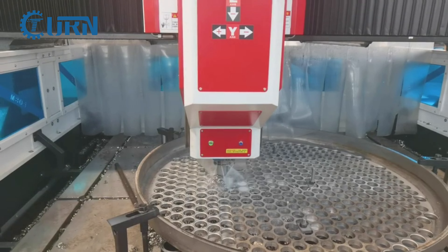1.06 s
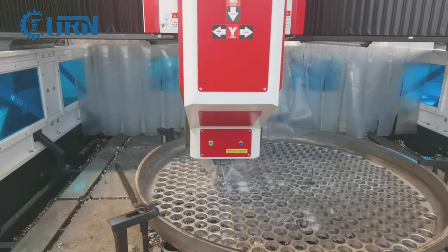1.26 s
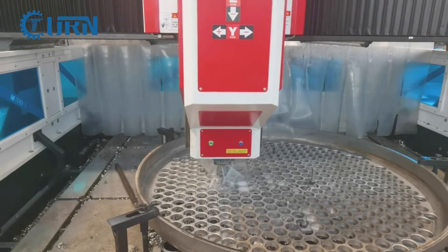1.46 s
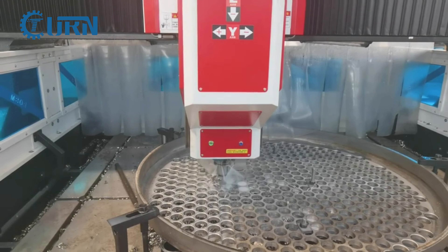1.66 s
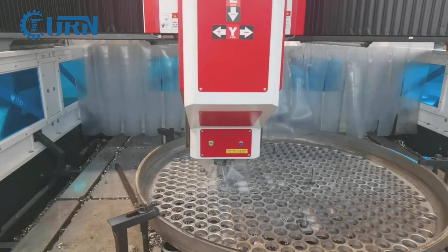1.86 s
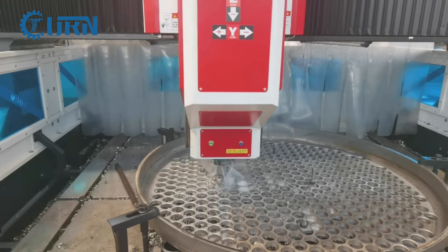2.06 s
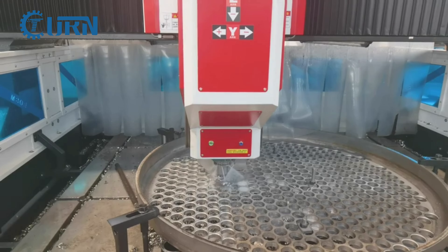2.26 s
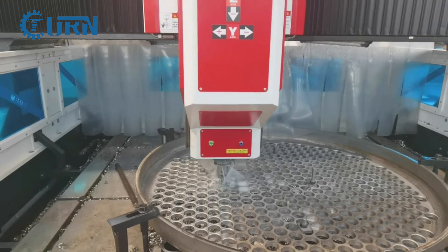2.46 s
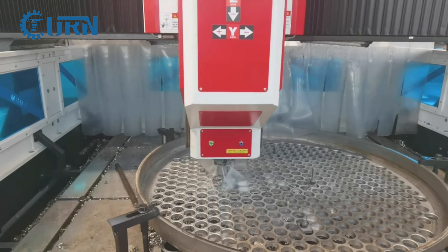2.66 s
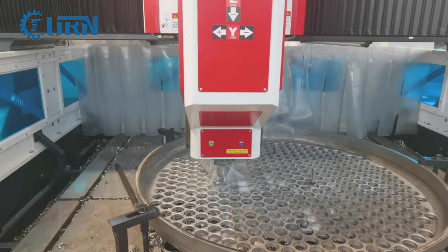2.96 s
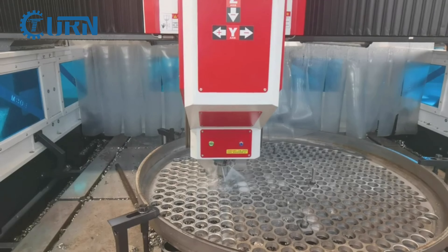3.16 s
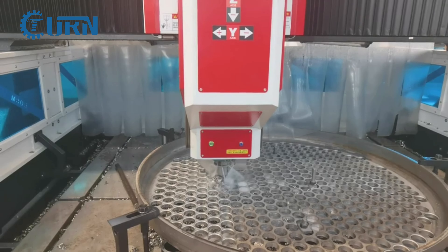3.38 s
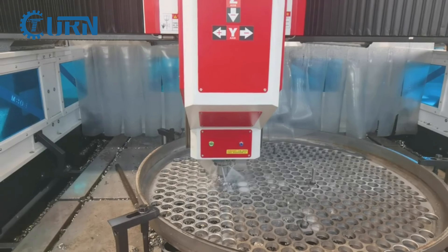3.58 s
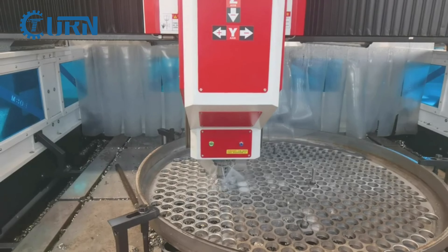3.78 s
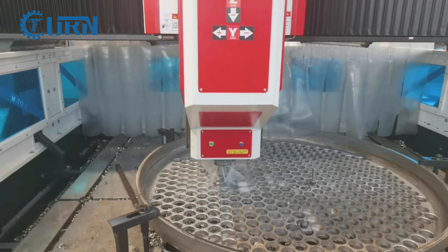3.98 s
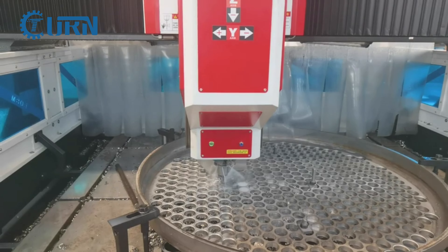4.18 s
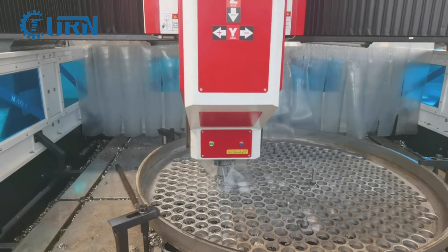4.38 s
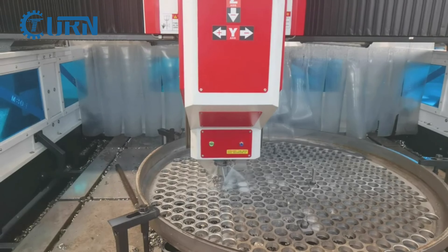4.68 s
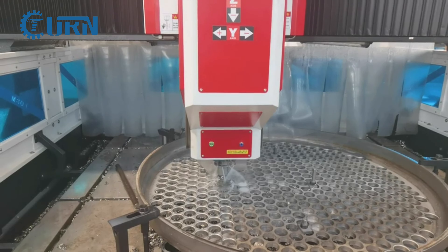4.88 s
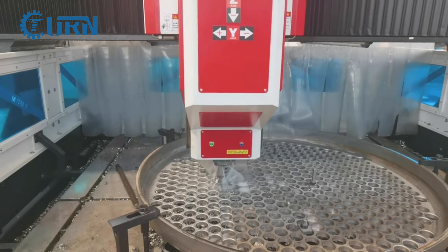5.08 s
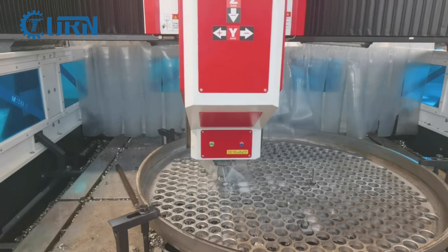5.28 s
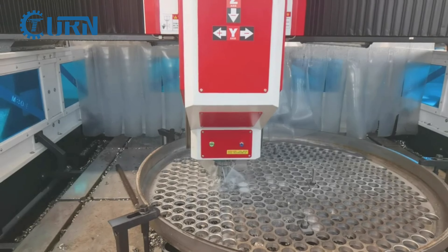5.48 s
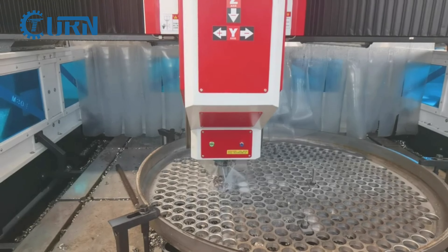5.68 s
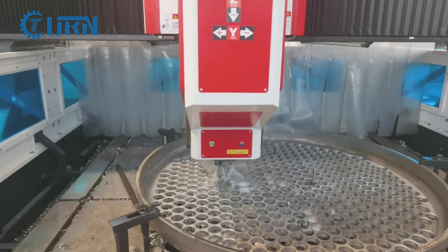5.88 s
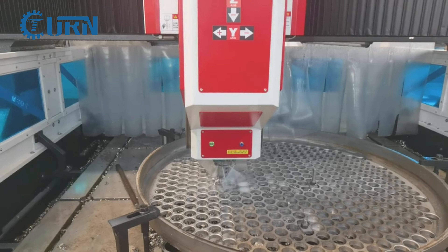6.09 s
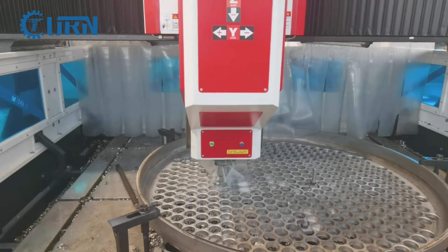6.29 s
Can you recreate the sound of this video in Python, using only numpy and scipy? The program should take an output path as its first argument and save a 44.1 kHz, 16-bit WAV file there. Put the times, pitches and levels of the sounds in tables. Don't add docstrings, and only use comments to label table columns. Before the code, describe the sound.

Steady wet hiss of coolant spattering on steel, loose metal rumbling at the start and again later, thin whine and short high squeals over hall hum.

```python
import sys
import numpy as np
from scipy import signal
from scipy.fft import rfft, irfft, next_fast_len
from scipy.io import wavfile
from scipy.ndimage import uniform_filter1d

SR = 44100
rng = np.random.default_rng(int(sys.argv[2]) if len(sys.argv) > 2 else 0)


def attenuation_scalar(level_db):
    decades = np.asarray(level_db, float) / 20
    return 10 ** decades


def output_pcm(signal):
    pcm = np.clip(np.atleast_2d(signal).T, -1, 1) * 32767
    wavfile.write(sys.argv[1], SR, np.round(pcm).astype(np.int16))


N = 284004
T = np.arange(N) / SR
M = next_fast_len(N, True)
FREQ = np.arange(M // 2 + 1) * SR / M


def unit(x):
    return x / np.sqrt(np.mean(x ** 2))


def on_log(table, hz):
    rows = np.array(table)
    return np.interp(np.log(hz), np.log(rows[:, 0]), rows[:, 1])


def curve(spans, column, off=-85.0):
    out = np.full(N, off)
    for rows in map(np.array, spans):
        inside = (T >= rows[0, 0]) & (T <= rows[-1, 0])
        value = np.interp(T[inside], rows[:, 0], rows[:, column])
        out[inside] = np.maximum(out[inside], value) if off < 0 else value
    return out


def bumps(rows):
    coarse = T[::32]
    db = sum(db * np.exp(-(2 * (coarse - s) / length) ** 2) for s, db, length in rows)
    return np.interp(T, coarse, db)


def walk(rate_hz, slew=0.84):
    hold = int(SR / rate_hz)
    steps = np.repeat(rng.standard_normal(N // 400 + 1), hold)[:N]
    slewed = uniform_filter1d(steps, int(hold * slew) + 1)
    return unit(uniform_filter1d(slewed, int(hold * slew / 2) + 1))


def grains(per_s, spread_db, share):
    hit = rng.random((2, M)) < per_s / SR
    size = attenuation_scalar(spread_db * rng.standard_normal((2, M))) * np.sign(rng.standard_normal((2, M)))
    return rfft(rng.standard_normal((2, M)) + share * unit(hit * size))


# frequency in Hz, left-right correlation.
SIDE_LIKENESS = [(60, 0.916), (260, 0.95), (530, 0.67), (1090, -.1), (1500, -0.1), (2250, .05), (9000, .03)]
# frequency in Hz, left minus right in dB.
SIDE_LEAN = [(60, 3.5), (110, -2), (190, -1), (330, 0.5), (570, 2), (1000, 1), (1760, 1.5), (3100, 0.5),
             (5440, 1), (9560, 0.5)]


def stereo(drive, shape):
    like = np.clip(on_log(SIDE_LIKENESS, FREQ + 1), -.5, 1)
    lean = attenuation_scalar(on_log(SIDE_LEAN, FREQ + 1) / 2)
    mid, side = drive[0] * np.sqrt(1 + like), drive[1] * np.sqrt(1 - like)
    return np.array([(mid + side) * lean, (mid - side) / lean]) * shape


def bands(drive, colour, lo_hz, hi_hz, move_db):
    tone = stereo(drive, attenuation_scalar(on_log(colour, FREQ + 1)) * (FREQ > lo_hz) * (FREQ < hi_hz))
    place, out = 2 * np.log2((FREQ + 1) / lo_hz), 0
    for k in range(int(place[FREQ < hi_hz].max()) + 2):
        share = np.cos(np.pi / 2 * np.clip(place - k, -1, 1)) ** 2
        out = out + irfft(tone * share, M)[:, :N] * attenuation_scalar(move_db(lo_hz * 2 ** (k / 2)))
    return out / np.std(irfft(tone, M))


def resonance(drive, hz, width_hz):
    mode = np.minimum(FREQ / hz, 1) ** 2 / (1 + 2j * (FREQ - hz) / width_hz)
    return unit(irfft(stereo(drive, mode), M)[:, :N])


# frequency in Hz, density in dB per Hz.
JET_COLOUR = [(900, -40), (1500, -18), (2300, -7.5), (2900, -5), (3300, -2.5), (4700, -0.5), (5600, 0),
              (6300, -3), (8600, -10.5), (9900, -13)]
# time in seconds, level in dB.
FLOW = [
    (0, -30.5),
    (1.1, -30),
    (2.4, -28),
    (3.0, -29.5),
    (3.5, -27),
    (4.6, -28.5),
    (5.2, -28.5),
    (6.44, -29),
]
# time in seconds, dB re flow, length in seconds.
GUSHES = [(0.035, 0.5, 0.023), (0.132, 0.5, 0.014), (0.19, -3.5, 0.037), (0.44, -3, 0.23),
          (0.249, 1.5, 0.068), (0.349, -3, 0.051), (0.387, 4, 0.032), (0.434, 1.5, 0.025),
          (0.469, -0.5, 0.033), (0.521, 1.5, 0.12), (0.943, 2, 0.029), (1.15, -2, 0.11), (1.272, -1, 0.038),
          (1.337, 2.5, 0.029), (1.404, 1.5, 0.12), (1.457, -1.5, 0.052), (1.616, -3.5, 0.031),
          (1.831, -2.5, 0.06), (2.133, -2.5, 0.042), (2.178, 2, 0.039), (2.285, -3, 0.029),
          (2.315, 3.5, 0.029), (2.472, 4.5, 0.092), (2.519, -2.5, 0.09), (2.569, -1, 0.02),
          (2.614, 2.5, 0.1), (2.701, -0.2, 0.054), (2.739, 1.5, 0.058), (2.826, -1.5, 0.041),
          (2.923, -2, 0.035), (2.963, -2.5, 0.016), (3.178, -1, 0.043), (3.322, -0.5, 0.069),
          (3.375, 1.5, 0.07), (3.532, 2, 0.053), (3.589, 4, 0.025), (3.637, -1.5, 0.028),
          (3.709, -2, 0.031), (3.799, 0.5, 0.073), (3.869, -3.5, 0.077), (3.986, 2, 0.026),
          (4.076, -1, 0.09), (4.195, -1, 0.03), (4.233, 1.5, 0.021), (4.285, 2.5, 0.1), (4.38, -3.5, 0.042),
          (4.495, -2.5, 0.038), (4.612, 0, 0.089), (4.727, -6.5, 0.046), (4.764, 3, 0.035),
          (4.799, 2.5, 0.067), (5.056, -0.5, 0.045), (5.158, -1.5, 0.068), (5.196, 3, 0.09),
          (5.537, 1.95, 0.11), (5.702, -0.5, 0.082), (6.011, -1.5, 0.077), (6.051, 3, 0.047),
          (6.119, 4, 0.049), (6.238, 2, 0.031)]


def jet():
    gush_db = bumps(GUSHES)
    level_db = curve([FLOW], 1) + gush_db
    splash_db = -0.07 + 0.26 * gush_db
    puffs, low, high = 1.3 * walk(70), walk(30), walk(30)
    puffs = puffs - uniform_filter1d(puffs, size=2300)

    def move_db(hz):
        octave = np.log2(hz / 5000)
        patch = np.cos(octave) * high + np.sin(octave) * low
        splash = np.clip(-1.6 * octave, 0, 1) * splash_db
        flutter = puffs * np.clip(1 - 0.8 * octave, 0, 1)
        return level_db + splash + flutter + .5 * patch + 0.87 * walk(30)
    return bands(grains(2000, 3.5, .55), JET_COLOUR, 1500, 10200, move_db) * attenuation_scalar(3.0)


# start in seconds, hold in seconds, body in dB, boom and clatter in dB re body.
SURGES = [(-.2, .1, -21, -10, 1), (0.041, 0.025, -26.5, -20, 0.5), (0.157, 0.015, -26.5, -21, 0.5),
          (0.219, 0.013, -21, -15, 0), (0.33, 0.071, -23, -11, -5), (0.483, 0.089, -27.5, -25, 1.5),
          (0.63, .03, -33, -17, 2), (0.771, .05, -39.5, -21, 4.5), (3.663, 0.089, -30.5, -2.5, 4.5),
          (3.859, 0.046, -35.5, 2, 4.5), (4.001, 0.03, -31, -9, 1), (4.087, 0.065, -25, -2, 1.0),
          (4.243, 0.13, -28, -9, 0.5), (4.352, 0.04, -32.5, -2, 3.5), (4.474, 0.1, -28.5, -6.5, 1),
          (4.725, 0.12, -33, -1, -7.5), (4.934, 0.083, -43, 10.5, -3)]


def surges(column, fade_db_s):
    power, rise_s, rise_db = 1e-9, 0.1, 12
    for row in SURGES:
        since_top = T - row[0] - rise_s
        peak_db = row[2] + (row[column] if column else 0)
        rise = rise_db * np.minimum(since_top / rise_s, 0)
        db = peak_db + rise - fade_db_s * np.maximum(since_top - row[1], 0)
        power = power + attenuation_scalar(np.maximum(db, -120)) ** 2
    return 10 * np.log10(power)


# frequency in Hz, density in dB per Hz.
RUMBLE_COLOUR = [(24, -50), (40, -27.5), (124, -9), (185, -3), (219, -4.5), (400, -5.5), (527, -4.5),
                 (611, -5.5), (1100, -4), (1570, -2), (2440, -2.5), (6000, -13), (7800, -47), (13200, -120)]
# frequency in Hz, width in Hz, level in dB re body.
PANELS = [(184.6, 12, -19), (463.3, 6.4, -19), (519, 13, -17.5), (633, 15, -20), (706.7, 12, -16.5),
          (956, 13, -18.5), (1100, 30, -20.5), (1216, 12, -18.5), (330.4, 13, -23), (395.6, 11, -25),
          (1676, 25, -22), (3564, 62, -20.5)]
# time in seconds, dB re surge, length in seconds.
KNOCKS = [(0.017, -0.3, 0.021), (0.082, 0.9, 0.031), (0.137, -2.1, 0.036), (0.195, -2, 0.05),
          (0.244, 4, 0.015), (0.314, -0.7, 0.057), (0.384, -0.1, 0.081), (0.446, 2, 0.03),
          (0.514, -0.6, 0.024), (0.693, 1, 0.022), (0.741, 1.5, 0.027), (0.791, -0.3, 0.02),
          (3.662, -1, 0.055), (3.754, -0.5, 0.03), (3.776, 1, 0.026), (3.811, -0.5, 0.074),
          (3.886, -1.5, 0.052), (3.941, 2, 0.028), (4.008, -4.5, 0.027), (4.053, -3.5, 0.071),
          (4.106, 4.5, 0.024), (4.146, 1.5, 0.083), (4.18, 0.4, 0.015), (4.358, 1.2, 0.044),
          (4.383, -2, 0.062), (4.442, 2, 0.048), (4.517, 0.5, 0.061), (4.555, 1.0, 0.014),
          (4.59, 1.6, 0.031), (4.702, 0.5, 0.061), (4.737, -0.2, 0.097), (4.827, 2.5, 0.02),
          (4.851, -2, 0.027), (4.886, 1.5, 0.042)]
# time in seconds, dB re surge, length in seconds.
MORE_KNOCKS = [(0.342, 4.5, 0.019), (0.28, -1.5, 0.019), (0.41, 3, 0.05), (0.69, 2.5, 0.017), (0.305, 4, 0.033),
               (0.21, -1, 0.028), (4.22, 2, 0.03), (4.30, 2.5, 0.023), (4.485, -5, 0.04), (4.25, 2, 0.02),
               (4.335, 1, 0.025), (4.545, 2, 0.029), (4.612, 3.5, 0.024)]


def rumble():
    body_db = surges(column=0, fade_db_s=47)
    boom_db = surges(column=3, fade_db_s=56) - body_db + 5
    clatter_db = surges(column=4, fade_db_s=54.5) - body_db
    drive, knocks = grains(900, 2.5, .5), 0.6 * walk(45, 0.3)

    def move_db(hz):
        boom, clatter = np.clip(np.log2(600 / hz), 0, 1), np.clip(np.log2(hz / 1300), 0, 1)
        return boom * boom_db + clatter * clatter_db + knocks + 1.5 * walk(30, 0.44)
    wash = bands(drive, RUMBLE_COLOUR, 30, 6000, move_db) * attenuation_scalar(2.0)
    rings = sum(attenuation_scalar(db + 1.5 * walk(5.5)) * resonance(drive, hz, width) for hz, width, db in PANELS)
    return (wash + rings) * attenuation_scalar(uniform_filter1d(body_db, 900) + bumps(KNOCKS) + bumps(MORE_KNOCKS))


# frequency in Hz, density in dB per Hz.
ROAR_COLOUR = [(15, -52), (25, -26.5), (107, -8.5), (145, -8), (208, -4), (238, -1.5), (267, -4.5),
               (299, -3.5), (430, -8.5), (630, -8), (749, -5), (1160, -4.5), (2400, -7), (3120, -32),
               (5280, -120)]
# frequency in Hz, width in Hz, level in dB.
HUM = [(140, 7, -56.5), (154.9, 3.3, -61), (300.2, 4.2, -60), (764, 6.6, -57.5), (2933, 17, -57)]
# frequency in Hz, pitch wander in Hz, level in dB.
PUMP = (242.6, 1.5, -56.5)
# time in seconds, swell in dB, length in seconds.
PUMP_SWELLS = [
    (1.95, 6.3, 0.3),
    (2.62, 4.4, 0.17),
    (3.12, 13, .25),
    (3.5, 10, 0.44),
    (5.95, 6.5, 0.56),
]


def hall():
    drive, swell = rfft(rng.standard_normal((2, M))), 0.81 * walk(1.5)
    roar = bands(drive, ROAR_COLOUR, 30, 2400, lambda hz: swell + 2.0 * walk(20, 0.58)) * attenuation_scalar(-38)
    pump_hz, wander_hz, pump_db = PUMP
    phase = 2 * np.pi * np.cumsum(pump_hz + wander_hz * walk(5.6)) / SR
    pump = attenuation_scalar(pump_db + bumps(PUMP_SWELLS)) * np.sin(phase) * np.sqrt(2)
    hum = sum(attenuation_scalar(db + 2.8 * walk(2.4)) * resonance(drive, hz, width) for hz, width, db in HUM)
    return roar + pump + hum


def squeal(spans, jitter_hz, rough_db, trim_db):
    hz = curve(spans, 1, spans[-1][0][1]) + jitter_hz * walk(90)
    level_db = uniform_filter1d(curve(spans, 2, -66.0), 500) + trim_db
    phase = 2 * np.pi * np.cumsum(hz) / SR
    beat_rad = .25
    sides = [np.sin(phase + beat_rad * walk(4.2)) * attenuation_scalar(level_db + rough_db * walk(45)) for _ in range(2)]
    return np.array(sides) * np.sqrt(2)


# time in seconds, frequency in Hz, level in dB.
WHINE = [
    (1.58, 5480, -44),
    (1.7, 5610, -41),
    (2.0, 5750, -41.5),
    (2.4, 5640, -44),
    (2.62, 5640, -52.5),
]


def whine():
    return squeal([WHINE], 15, 4.2, -0.13)


# start in seconds, length in seconds, frequency in Hz, peak in dB.
BITES = [
    (3.34, .12, 4285, -39),
    (5.18, .075, 4163, -33.5),
    (5.46, .065, 4150, -34.5),
    (5.5, .115, 4160, -36.5),
    (5.785, .075, 4160, -35.5),
    (5.83, .14, 4157, -33),
    (6.17, .09, 4140, -31),
    (6.23, .11, 4165, -37.5),
]


def bites():
    grip_s, slip_s, let_go_db = 0.046, .025, 9.5
    outlines = []
    for s, length, hz, db in BITES:
        end = s + length
        outlines.append([(s, hz, db - let_go_db), (s + grip_s, hz, db),
                         (end, hz, db), (end + slip_s, hz, db - let_go_db)])
    return squeal(outlines, 3, 1.5, 0)


def scene():
    return jet() + rumble() + hall() + whine() + bites()


BAND_EDGES = np.r_[0:40:4, 40:96:8, 96, 108, 120, 132, 144, 160, 176, 196, 216, 240, 264, 292, 320:476:32]


def thin_lines(x, steps, grid, window):
    hop = 1024
    n, k = np.arange(2 * hop)[:, None], np.arange(476)
    basis = window[:, None] * np.cos(np.pi / hop * (n + .5 + hop / 2) * (k + .5)) * np.sqrt(2 / hop)
    count = N // hop + 2
    turn = np.array([[1, 0.98], [1, -1]]) / np.sqrt(2)
    padded = np.pad(turn @ x, ((0, 0), (hop - grid, 3 * hop)))[:, :(count + 1) * hop].reshape(2, -1, hop)
    lines = np.concatenate([padded[:, :-1], padded[:, 1:]], axis=2) @ basis

    band = np.searchsorted(BAND_EDGES, k, side="right") - 1
    member = band[:, None] == np.arange(len(BAND_EDGES))
    per_band = member.sum(axis=0)
    power = uniform_filter1d(np.mean(lines ** 2, axis=0), size=5, axis=0)
    power = uniform_filter1d(power, size=25, axis=1) + 1e-12
    power = power ** .43 * power.mean(axis=1, keepdims=True) ** .1 * power.mean(axis=0) ** .47
    power = (power @ member / per_band)[:, band]

    luck = rng.standard_normal((count + 1, band.max() + 1))
    luck = .7 * luck[1:] + .35 * luck[:-1] + 1.0 * uniform_filter1d(luck[1:], size=4, axis=1)
    luck = np.minimum(luck, 1.3)
    hz = ((k + .5) @ member / per_band)[band] * SR / (2 * hop)
    rows = np.array(steps)
    step_db = on_log(rows[:, :2], hz) + on_log(rows[:, ::2], hz) * luck[:, band]
    step = np.sqrt(power) * attenuation_scalar(step_db)
    frames = (np.sign(lines) * np.floor(np.abs(lines) / step + .4054) * step) @ basis.T
    head = np.pad(frames[:, :, :hop], ((0, 0), (0, 1), (0, 0)))
    tail = np.pad(frames[:, :, hop:], ((0, 0), (1, 0), (0, 0)))
    return turn @ (head + tail).reshape(2, -1)[:, hop - grid:][:, :N]


def short_gaps(x):
    hz, _, cells = signal.stft(x, SR, nperseg=256, noverlap=128)
    luck = rng.standard_normal((34, cells.shape[2] // 5 + 1))
    luck = unit(uniform_filter1d(luck, size=2, axis=0)) * .85 + .5 * luck[33]
    lost = np.repeat(np.repeat(luck > 1.47, 4, axis=0), 5, axis=1)[:len(hz), :cells.shape[2]]
    in_range = (hz > 1100) & (hz < 7500)
    gain = np.where(lost & in_range[:, None], attenuation_scalar(-28), 1)
    return signal.istft(cells * gain, SR, nperseg=256, noverlap=128)[1][:, :N]


# frequency in Hz, step in dB re band rms, its scatter in dB.
COARSE_STEPS = [(300, -20, 3), (900, -9, 6), (1300, -2.5, 6), (1720, 0, 5), (1800, 8, 5), (2010, 8, 5),
                (2120, 2, 5.5), (3000, 4, 5.5), (5000, 6, 4.5), (7000, 6.5, 3.5), (7900, 7, 3),
                (8600, 8.5, 3.5), (9300, 16, 11), (9720, 40, 3)]
# frequency in Hz, step in dB re band rms, its scatter in dB.
FINE_STEPS = [(150, -16, 3), (500, -21, 3), (900, -13, 3), (1600, -3, 3), (3000, 0, 3), (5200, -1, 3),
              (7600, 0, 3), (9000, 1, 3)]


def thin_sound(x):
    sine = np.sin(np.pi * (np.arange(2 * 1024) + .5) / (2 * 1024))
    steep = signal.windows.kaiser_bessel_derived(2 * 1024, 4 * np.pi)
    coarse = thin_lines(x, COARSE_STEPS, 681, sine)
    return thin_lines(short_gaps(coarse), FINE_STEPS, 105, steep)


def top_cut(x):
    return signal.sosfilt(signal.butter(12, 10300, fs=SR, output="sos"), x)


def record(dry):
    highpass = signal.butter(2, 38, "highpass", fs=SR, output="sos")
    x = attenuation_scalar(2.5) * signal.sosfilt(highpass, dry)
    mix = thin_sound(np.tanh(1.2 * x) / 1.2)
    return top_cut(mix)


dry = scene()
out = record(dry)
output_pcm(out)
```